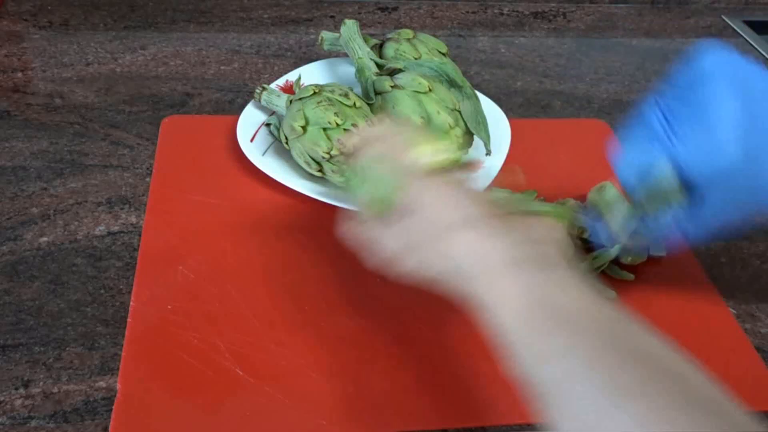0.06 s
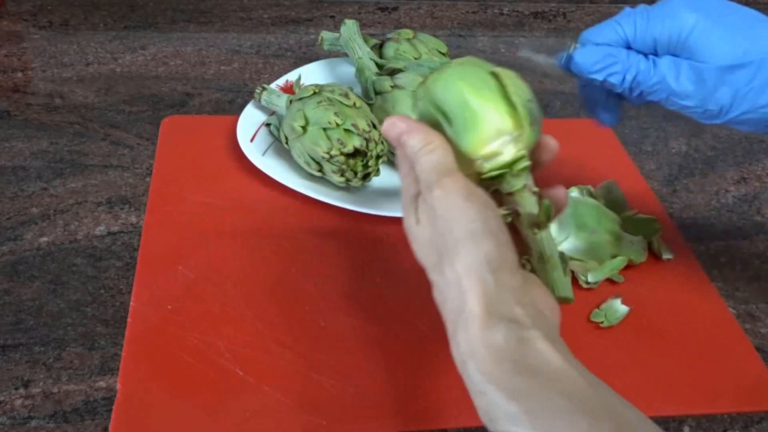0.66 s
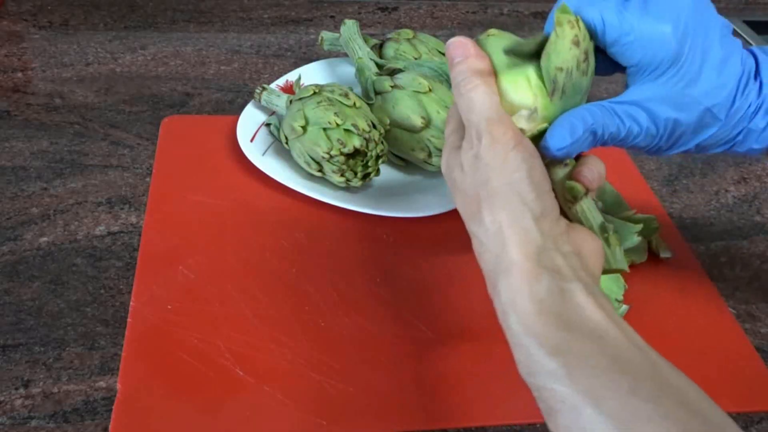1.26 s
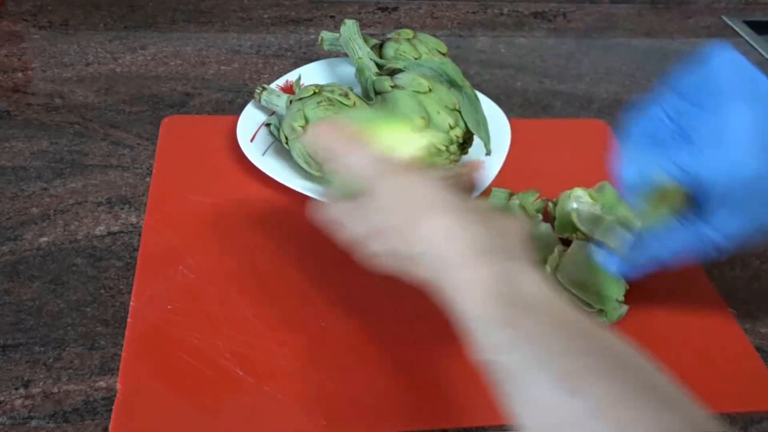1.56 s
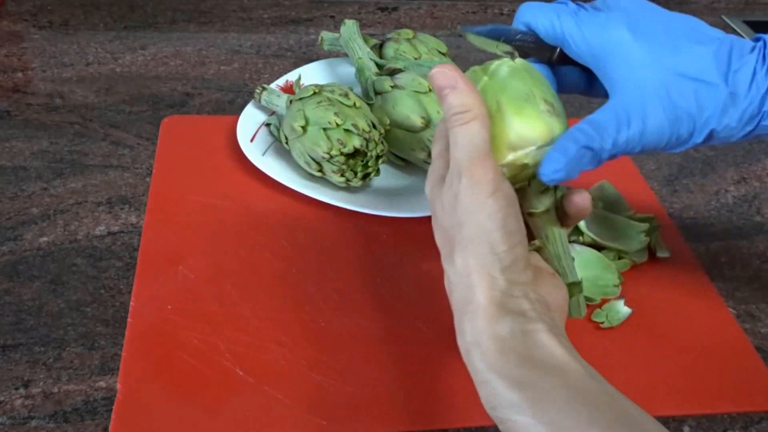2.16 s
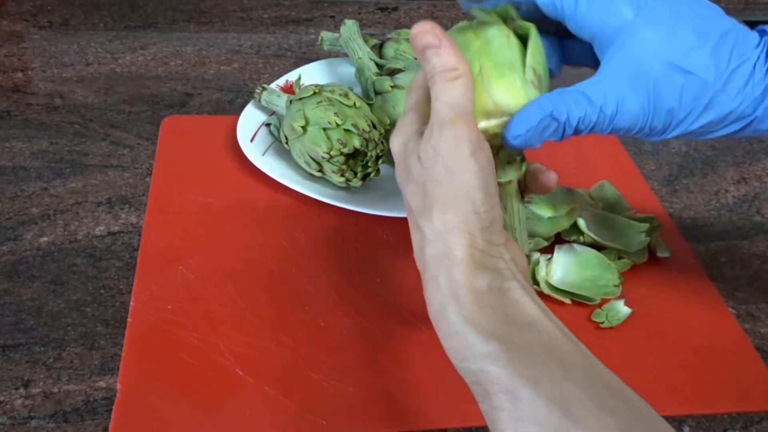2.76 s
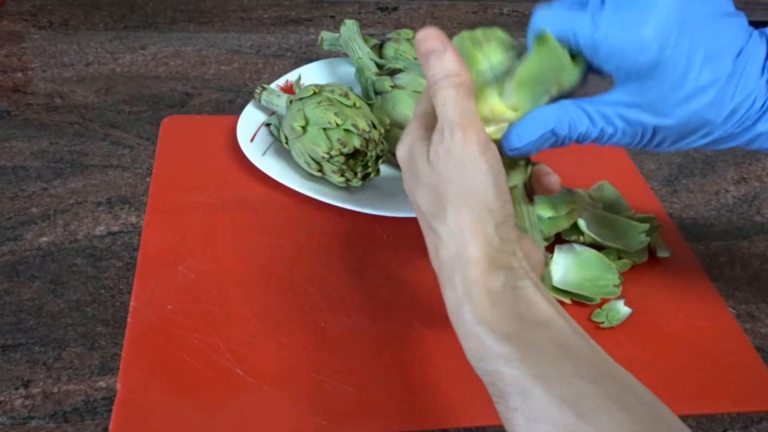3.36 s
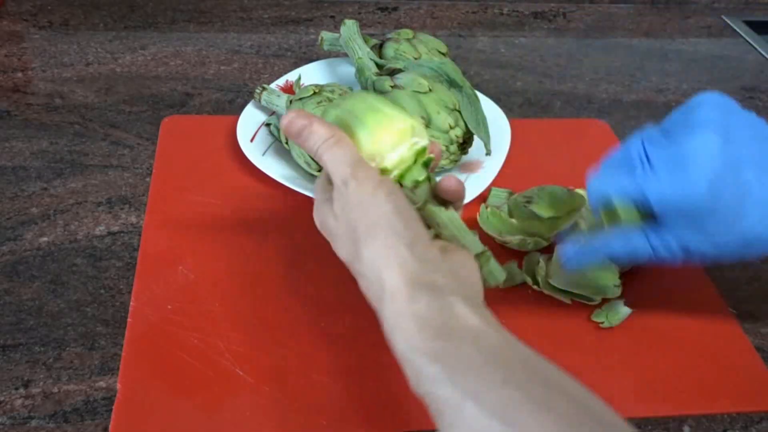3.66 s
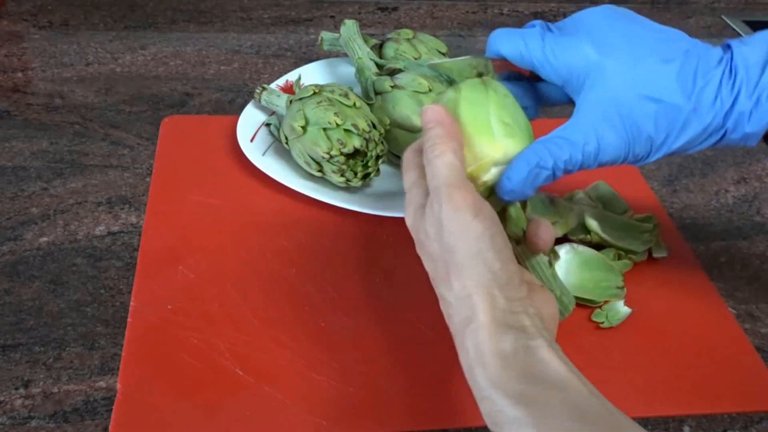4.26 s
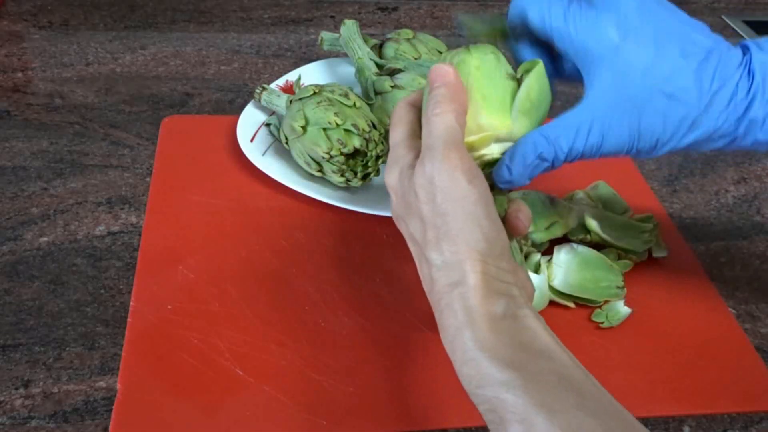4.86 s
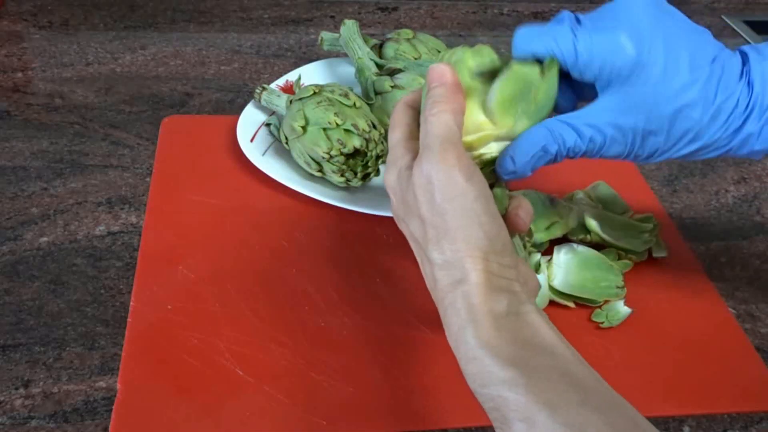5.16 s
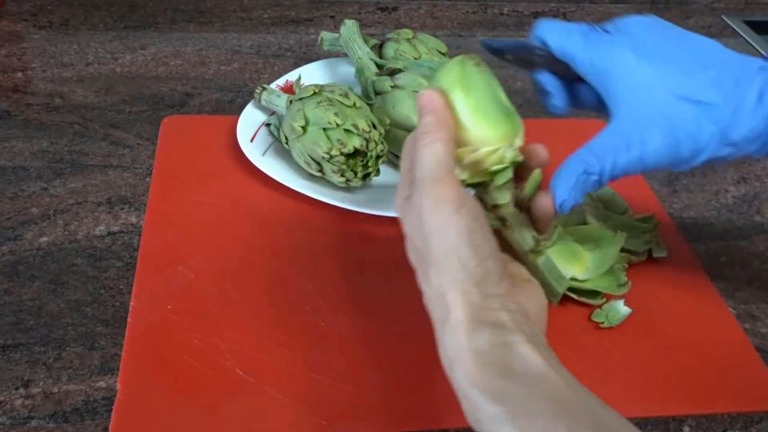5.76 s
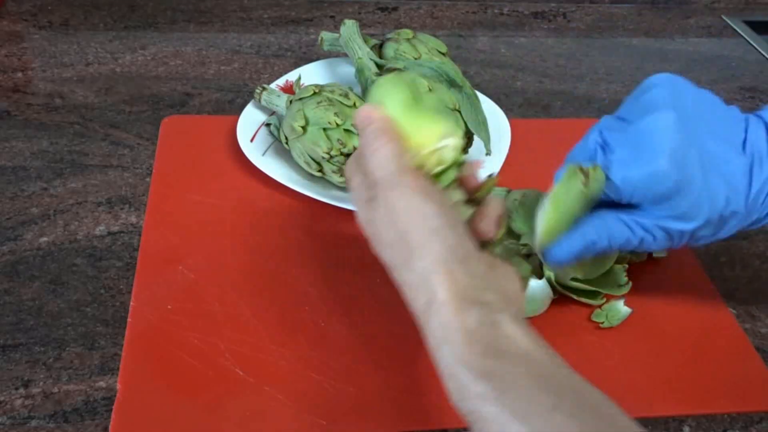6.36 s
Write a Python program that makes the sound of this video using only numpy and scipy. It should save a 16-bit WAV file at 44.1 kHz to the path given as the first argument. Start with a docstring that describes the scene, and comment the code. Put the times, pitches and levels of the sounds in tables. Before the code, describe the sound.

Waxy leaves squeak against each other, then crack and tear off a raw artichoke, with faint rustling and small dull knocks between.

```python
"""A kitchen, two microphones close together over a cutting board, the work just right of centre.
A gloved hand bends back the tough outer leaves of an artichoke and snaps them off. Each waxy leaf
squeaks and rasps against its neighbours, then its base cracks and the last fibres tear.
Small dull knocks and a faint rustle fall in between. The room rings briefly over its own quiet tone,
and a fast limiter holds the loudest cracks down."""
import sys
import numpy as np
from scipy import signal
from scipy.fft import rfft, irfft, next_fast_len
from scipy.io import wavfile
from scipy.ndimage import uniform_filter1d, minimum_filter1d

SR = 44100
rng = np.random.default_rng(int(sys.argv[2]) if len(sys.argv) > 2 else 0)


def wrap_up_sound(samples):
    """Save the sound to the file named by the first command line argument, as 16-bit audio."""
    columns = np.atleast_2d(samples).T
    # keep every value between -1 and 1, then stretch to whole-number steps
    tamed = np.clip(columns, -1, 1)
    steps = np.round(tamed * 32767).astype(np.int16)
    wavfile.write(sys.argv[1], SR, steps)


N = 292383

# the quiet room: (frequency [Hz], relative level [dB])
ROOM_SPECTRUM = [(30, -31), (130, -35.5), (230, -28), (400, -17), (530, -8.5), (630, -5), (820, -9),
                 (1500, -10), (2700, -9), (7500, -14), (16000, -22)]
# diffuse sound at the microphone pair: (frequency [Hz], left-right correlation [0-1])
MIC_LIKENESS = [(50, 0.32), (130, .5), (300, 0.93), (650, 0.93), (1300, 0.77), (2600, 0.49), (5000, 0.012),
                (16000, 0.011)]
# the leaf as a radiator of its own slips: (frequency [Hz], gain [dB])
LEAF_SPECTRUM = [(60, -20), (250, -32), (600, -12), (1200, -5.5), (1800, -3), (3200, 1.5), (6000, 2),
                 (10000, 0), (16000, -1)]
# partials of regular slipping: (frequency [multiple of the slip rate], level [dB])
SLIP_PARTIALS = [(.5, -18), (1, 3), (2, -3), (3, -7.5), (4, -34)]
# a leaf is pulled, cracks at its base and tears away: (crack time [s], crack level [dB],
# tear centre [Hz], pull length [s], pull level [dB], slip rate [Hz], tear delay [s], tear level [dB])
LEAF_BREAKS = [(.159, 8.5, 3300, 0.19, -39, 3400, 0.0022, -6),
               (1.494, 6.5, 2890, 0.088, -27.5, 4240, 0.021, -5.5),
               (1.665, 5.5, 3780, 0.018, -32, 4120, .036, -9.5),
               (3.588, 6, 4200, 0.072, -27.5, 5000, 0.014, -9.5),
               (3.698, 8.5, 2970, 0.046, -40, 3670, 0.014, -13),
               (5.467, 6, 4100, 0.139, -29, 3554, .036, -11.5),
               (6.421, 4.5, 2690, 0.1, -40.5, 4000, 0.013, -22.5)]
# leaf sliding on leaf:
# (peak time [s], half length [s], relative level [dB], slip rate [Hz], roughness [0 = pure squeak])
LEAF_SLIDES = [(.005, 0.016, -33, 3743, 0.8), (0.65, .02, -49, 4500, 0.96),
               (1.076, 0.0056, -33.5, 6600, 1.18), (1.199, 0.0073, -37.5, 7000, 0.51),
               (1.295, .006, -36, 7900, 0.8), (1.33, 0.019, -34, 2900, 0.9),
               (1.367, 0.021, -28.5, 6100, 0.66), (1.406, 0.014, -24, 5850, 0.38),
               (1.959, 0.016, -43, 3700, 0.89), (2.571, 0.014, -24, 2818, 0.41),
               (2.858, 0.021, -22.5, 4900, 0.71), (2.882, 0.0041, -26, 9540, 0.13),
               (2.934, 0.01, -26, 4600, 0.65), (3.332, .02, -27, 8500, 0.75),
               (3.364, 0.011, -28, 3000, 0.53), (3.43, 0.021, -28.5, 3810, 0.76),
               (3.519, 0.013, -24, 3850, 0.58), (3.902, 0.012, -43.5, 5000, .9),
               (4.418, 0.0051, -26.5, 11000, 0.35), (4.427, .004, -24, 8180, 0.2),
               (4.438, 0.0073, -25.5, 6060, .3), (4.532, 0.0028, -23, 2750, 0.2),
               (4.742, 0.01, -27, 6100, 0.6), (4.798, 0.016, -20, 7200, 0.67),
               (4.847, .011, -35.5, 4200, .5), (5.251, 0.0099, -28, 3800, 0.53),
               (5.278, 0.0089, -23.5, 3012, 0.5), (5.336, 0.021, -30.5, 3200, 0.54),
               (5.389, 0.015, -23, 3725, .55), (5.682, 0.012, -49, 4100, 0.54),
               (6.218, 0.0059, -36, 4300, 0.57)]
# single fibres giving way: (time [s], level [dB], centre [Hz])
FIBRE_CRACKS = [(.071, -6, 3670), (.204, 0, 4300), (1.608, -15, 5950), (2.659, -16.5, 2450),
                (2.674, -15, 2700), (3.11, -15.5, 6000), (3.124, -19, 5660), (3.308, -14.5, 5000),
                (3.527, -4, 5000), (3.546, -7, 5100), (4.530, -14, 2050), (4.838, -8, 4570),
                (5.423, -2, 5300), (5.482, 0, 6600), (6.381, -4, 4300)]
# dull knocks of handling over the board: (time [s], peak level [dB])
HANDLING_KNOCKS = [(.335, -34.5), (.451, -38), (.471, -33.5), (.844, -43), (1.702, -44), (2.039, -40),
                   (2.075, -42), (2.658, -34.5), (3.965, -37), (4.065, -18.5), (5.246, -36), (5.787, -40)]
# what the knocks ring with: (frequency [Hz], bandwidth [Hz], level [dB])
KNOCK_RESONANCES = [(760, 97, 3.5), (945, 130, 2.5), (1510, 260, -1.5), (2250, 640, 14), (3700, 600, 3)]
# colour of the kitchen's tail: (frequency [Hz], relative level [dB])
TAIL_SPECTRUM = [(100, 0), (400, -1.5), (900, 6.5), (1350, 8.5), (1700, 0.5), (2200, 4), (3500, 2.5),
                 (6000, 2.5), (10000, 4.5), (16000, 6)]
# decay of that tail: (frequency [Hz], time to fall 60 dB [s])
TAIL_T60 = [(100, 0.89), (700, 0.42), (3000, 0.35), (8000, 0.31), (16000, 0.24)]


def from_db(db):
    """Decibels to gain."""
    return 10 ** (np.asarray(db) / 20)


def rms_one(x):
    """Scale to unit rms."""
    return x / np.sqrt(np.mean(x ** 2) + 1e-20)


def at_hz(points, hz):
    """Read a table on a log-frequency axis."""
    f, value = np.transpose(points)
    return np.interp(np.log(np.maximum(hz, 1)), np.log(f), value)


def colour(x, spectrum):
    """Give a noisy sound a spectrum."""
    size = next_fast_len(x.shape[-1])
    gain = from_db(at_hz(spectrum, np.fft.rfftfreq(size, 1 / SR)))
    return irfft(rfft(x, size) * gain, size)[..., :x.shape[-1]]


def butter(x, hz, kind, order=1):
    """Causal low-, high- or band-pass."""
    edges = np.clip(hz, 10, .47 * SR)
    return signal.sosfilt(signal.butter(order, edges, kind, fs=SR, output="sos"), x + 1e-18)


def add(track, s, sound):
    """Mix a sound into a track, starting at s seconds."""
    at = round(s * SR)
    sound = sound[max(-at, 0):N - at]
    track[max(at, 0):max(at, 0) + len(sound)] += sound


def grains(size, per_s, spread_db):
    """Random clicks of uneven size and sign; rms 1."""
    sizes = from_db(spread_db * np.minimum(rng.exponential(1, size), 3))
    signs = rng.choice([-1, 1], size)
    return rms_one(sizes * signs * (rng.random(size) < per_s / SR))


def burst(t, decay_s, per_s, spread_db):
    """A dying run of grains; energy 1."""
    run = grains(len(t), per_s, spread_db) * np.exp(-t / decay_s)
    return rms_one(run) / np.sqrt(len(t))


def wander(size, hz):
    """Random drift, mostly slower than hz; rms 1."""
    return rms_one(butter(rng.standard_normal(size), hz, "low", order=2))


def diffuse(size):
    """White noise arriving from all sides at two close microphones."""
    padded = next_fast_len(size)
    mid, side = rfft(rng.standard_normal((2, padded)))
    alike = at_hz(MIC_LIKENESS, np.fft.rfftfreq(padded, 1 / SR))
    return irfft(np.sqrt(1 + alike) * mid + np.sqrt(1 - alike) * side * [[1], [-1]], padded)[:, :size]


def room_tone(level_db=-50):
    """The steady hush of the kitchen, all around the microphones."""
    return from_db(level_db) * rms_one(colour(diffuse(N), ROOM_SPECTRUM))


def rustle(resting_db=-63, grip_db=-56, put_down_db=-51, put_down_after_s=.28, clump_db=3):
    """Glove and leaves rub all the while, more around each slide, most as a torn leaf is put down."""
    t = np.arange(N) / SR
    gripping = np.max([np.exp(-np.abs(t - s) / .156) for s, *_ in LEAF_SLIDES], axis=0)
    putting_down = np.max([np.exp(-np.abs(t - s - put_down_after_s) / .11)
                           for s, *_ in LEAF_BREAKS], axis=0)
    handling = np.hypot(from_db(grip_db) * gripping, from_db(put_down_db) * putting_down)
    level = np.hypot(from_db(resting_db), handling)
    rub = butter(colour(grains(N, per_s=2500, spread_db=-2), LEAF_SPECTRUM), 7500, "low")
    return level * rms_one(rub * from_db(clump_db * wander(N, 52)))


def stick_slip(pressure, slip_hz, centre_hz, rough, skin_top_hz=11000, flutter_db=3.5):
    """Waxy leaves stick and slip: regular slips give a squeak, irregular ones a grainy rasp."""
    size = len(pressure)
    grip_sway = .07 * wander(size, 110)
    jitter = .22 * rough * wander(size, 600)
    rate = slip_hz * np.exp(grip_sway + jitter)
    phase = 2 * np.pi * np.cumsum(rate) / SR
    tone = sum(from_db(db) * np.sin(k * phase) * (k * rate < SR / 2) for k, db in SLIP_PARTIALS)
    tone = butter(tone, skin_top_hz, "low", order=2)   # the soft skin damps the overtones
    rasp = butter(grains(size, per_s=6000, spread_db=4), [centre_hz / 6.3, centre_hz * 1.69], "band")
    # the contact keeps tipping between squeaking and rasping
    rasp_share = np.clip(.8 * rough * (1 + .35 * wander(size, 110)), 0, 1)
    slips = np.sqrt(1 - rasp_share) * rms_one(tone) + np.sqrt(rasp_share) * rms_one(rasp)
    flutter = from_db(flutter_db * wander(size, 290))   # the leaf keeps catching
    radiated = pressure * colour(slips, LEAF_SPECTRUM) * flutter
    return rms_one(radiated) * np.sqrt(np.mean(pressure ** 2))


def pulls(rise_db=6.5, edge_s=.01, crackle_db=-14.5):
    """A leaf bent back rasps ever harder on its neighbours and small fibres part, until it gives."""
    out, t = np.zeros(N), np.arange(-SR // 2, SR // 8) / SR
    for s, _, _, pull_s, db, hz, _, _ in LEAF_BREAKS:
        held = np.clip(np.minimum(t + pull_s, edge_s - t) / edge_s, 0, 1)
        pressure = held * from_db(rise_db * np.minimum(t, 0) / pull_s)
        crackle = rms_one(butter(grains(len(t), per_s=96, spread_db=2), [hz / 2, hz * 2], "band"))
        rasp = stick_slip(pressure, hz, hz, rough=.97)
        add(out, s + t[0], from_db(db) * (rasp + from_db(crackle_db) * pressure * crackle))
    return out


def squeaks(gain_db=1, sag=.78):
    """Short slides of leaf on leaf: the pressure swells and lets go while the slip rate sags."""
    out, t = np.zeros(N), np.arange(-SR // 8, SR // 8) / SR
    for s, half_s, db, hz, rough in LEAF_SLIDES:
        glide_hz = hz * sag ** np.tanh(t / half_s / 2)
        pressure = np.exp(-.8 * (t / half_s) ** 2)
        add(out, s + t[0], from_db(db + gain_db) * stick_slip(pressure, glide_hz, hz, rough))
    return out


def fracture(db, hz, decay_s, fibres_db=-17, band_ratio=1.596):
    """One sharp crack, then a dying run of small ones as the fibres give way."""
    t = np.arange(SR // 8) / SR
    fibres = butter(burst(t, decay_s, per_s=7000, spread_db=4), 12000, "low")
    fibres *= from_db(fibres_db) * np.sqrt(decay_s * SR / 2)   # a longer tear breaks more fibres
    banded = butter(np.array([t == 0, fibres]), [hz / band_ratio, hz * band_ratio], "band")
    crack, run = butter(banded, hz * 5.2, "low")
    return butter(from_db(db) * (crack + run) / np.abs(crack).max(), 380, "high", order=2)


def snaps(crack_over_tear=1.205):
    """Each base breaks with a short bright crack and a long duller tear; single fibres only crack."""
    out = np.zeros(N)
    for s, crack_db, tear_hz, *_, delay_s, tear_db in LEAF_BREAKS:
        add(out, s, fracture(crack_db, tear_hz * crack_over_tear, decay_s=.002, fibres_db=-21.5))
        add(out, s + delay_s, fracture(tear_db, tear_hz, decay_s=.036))
    for s, db, hz in FIBRE_CRACKS:
        add(out, s, fracture(db, hz, decay_s=.00067 * (4700 / hz) ** 2))   # lower cracks last longer
    return out


def knocks(scuff_db=-3, db_per_octave=15):
    """A soft, scuffing contact over the board sets a few quickly dying modes ringing."""
    out, t = np.zeros(N), np.arange(SR // 8) / SR
    for s, db in HANDLING_KNOCKS:
        # each contact falls on another spot, so the modes shift a little
        shifts = rng.normal(1, .04, len(KNOCK_RESONANCES))
        ring = sum(from_db(level) * np.exp(-np.pi * width * t) * np.cos(2 * np.pi * hz * shift * t)
                   for (hz, width, level), shift in zip(KNOCK_RESONANCES, shifts))
        contact = (t == 0) + from_db(scuff_db) * burst(t, decay_s=.0035, per_s=8000, spread_db=2)
        top_hz = 900 * 2 ** ((db + 40) / db_per_octave)   # a harder knock is brighter
        knock = butter(signal.fftconvolve(ring, contact)[:len(t)], top_hz, "low", order=2)
        knock = butter(knock, 500, "high", order=3)
        add(out, s, from_db(db) * knock / np.abs(knock).max())
    return out


def kitchen(x, tail_db=1, early_db=2, early_s=.0045, board_db=-9, board_s=.0025, stretches=24):
    """The microphones get direct sound, a board bounce, scatter and a tail whose treble dies first."""
    t, hz = np.arange(SR // 2) / SR, np.fft.rfftfreq(SR // 2, 1 / SR)
    tail_gain = from_db(at_hz(TAIL_SPECTRUM, hz))
    bands = [(tail_gain * at_hz([(f, f == centre) for f, _ in TAIL_T60], hz), from_db(-60 * t / t60))
             for centre, t60 in TAIL_T60]
    # hands, plate and worktop scatter strongly in the first milliseconds
    arrival = (1 - np.exp(-t / board_s)) * (1 + from_db(early_db) * np.exp(-t / early_s))
    out = np.zeros((2, N))
    # the hands keep moving, so every short stretch reaches the microphones by other paths
    for stretch in np.array_split(np.arange(N), stretches):
        noise = rfft(diffuse(len(t)))
        tail = sum(irfft(noise * weight, len(t)) * decay for weight, decay in bands)
        response = from_db(tail_db) * rms_one(tail * arrival) / np.sqrt(len(t))
        response[:, 0] += 1   # direct sound
        response[:, round(board_s * rng.uniform(.85, 1.15) * SR)] += from_db(board_db)
        for track, path in zip(out, response):
            add(track, stretch[0] / SR, signal.fftconvolve(x[stretch], path))
    return out


def scene(left_lag_samples=.61):
    """The hands work just right of centre: the left microphone hears them a touch later and softer."""
    left, right = kitchen(pulls() + snaps() + squeaks() + knocks() + rustle())
    left = np.convolve(left, np.sinc(np.arange(-20, 21) - left_lag_samples), "same")
    work = np.array([left, right]) * from_db([[-.3], [.3]])
    return work + room_tone()


def record(dry, ceiling_db=-5, release_db_per_s=3000, cutoff_hz=16000):
    """Behind the microphones, a fast look-ahead limiter and then a steep low-pass."""
    over_db = np.maximum(20 * np.log10(np.abs(dry).max(axis=0) + 1e-9) - ceiling_db, 0)
    release = release_db_per_s * np.arange(N) / SR
    held_db = np.maximum.accumulate(over_db + release) - release
    gain_db = uniform_filter1d(minimum_filter1d(-held_db, size=25), size=25)
    low_pass = signal.ellip(12, .1, 80, cutoff_hz, fs=SR, output="sos")
    return signal.sosfilt(low_pass, dry * from_db(gain_db))


dry = scene()
out = record(dry)
wrap_up_sound(out)
```